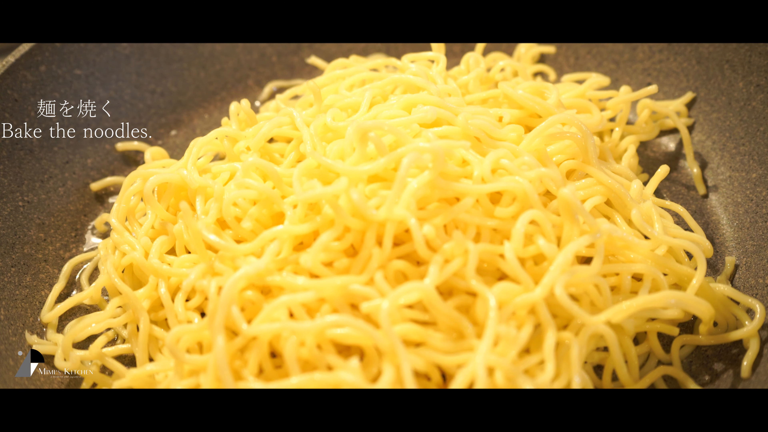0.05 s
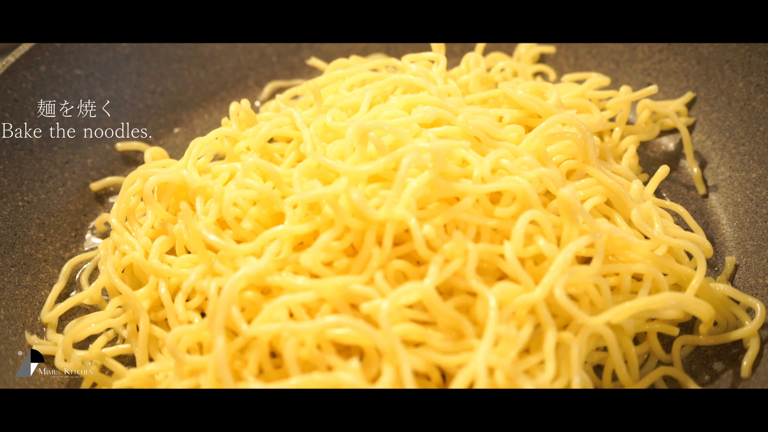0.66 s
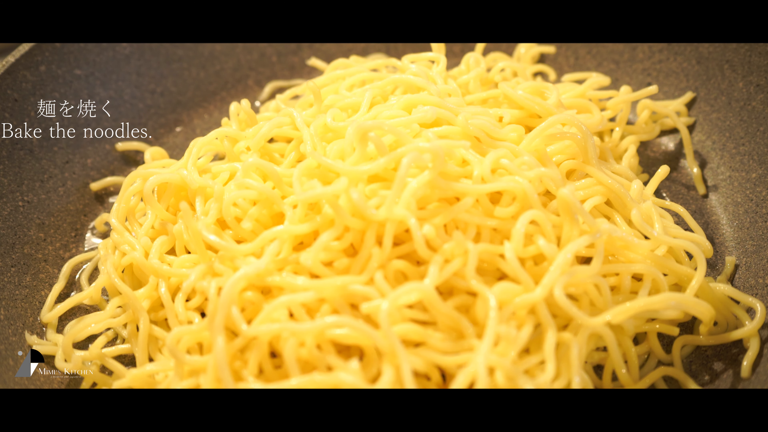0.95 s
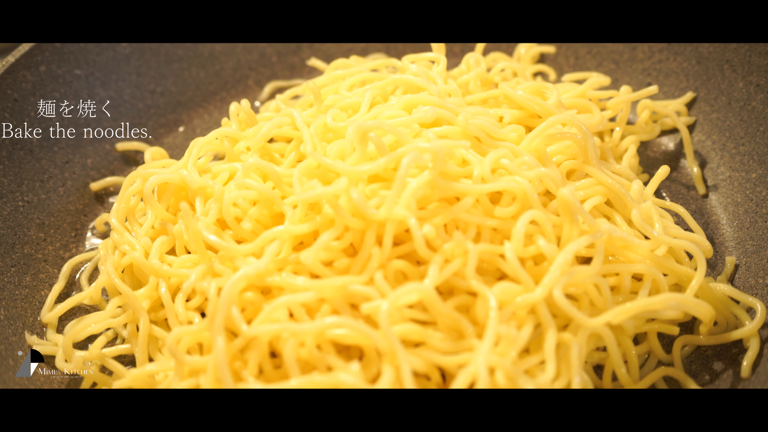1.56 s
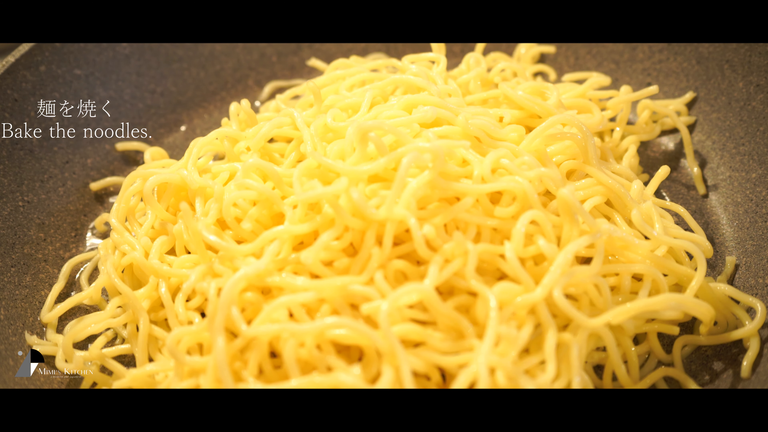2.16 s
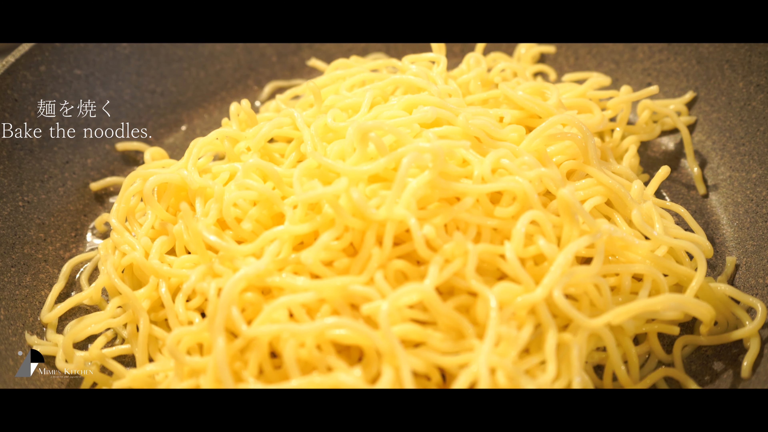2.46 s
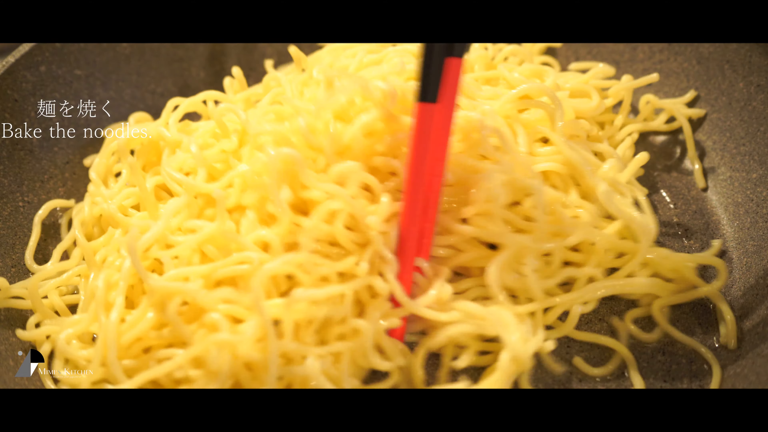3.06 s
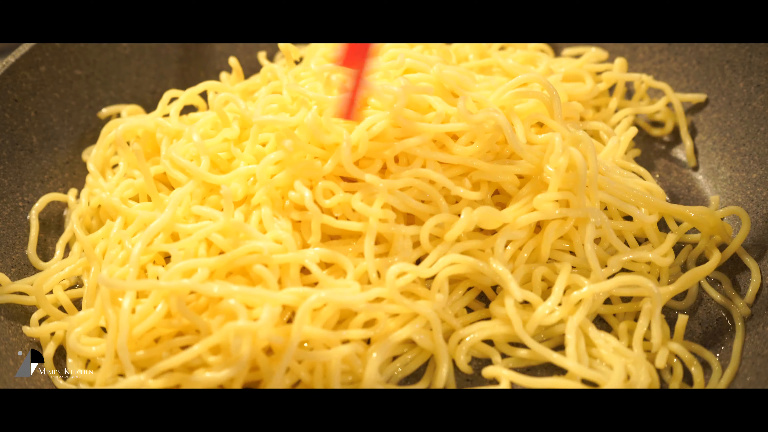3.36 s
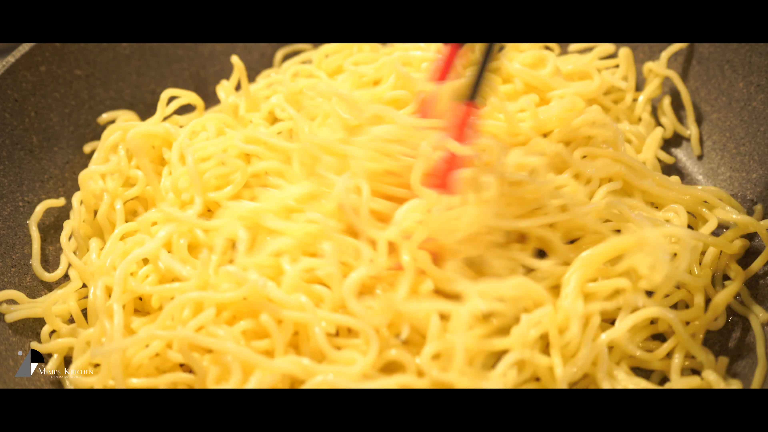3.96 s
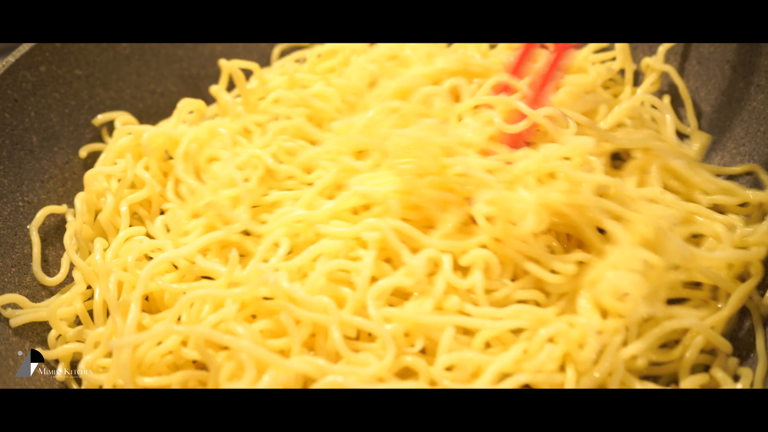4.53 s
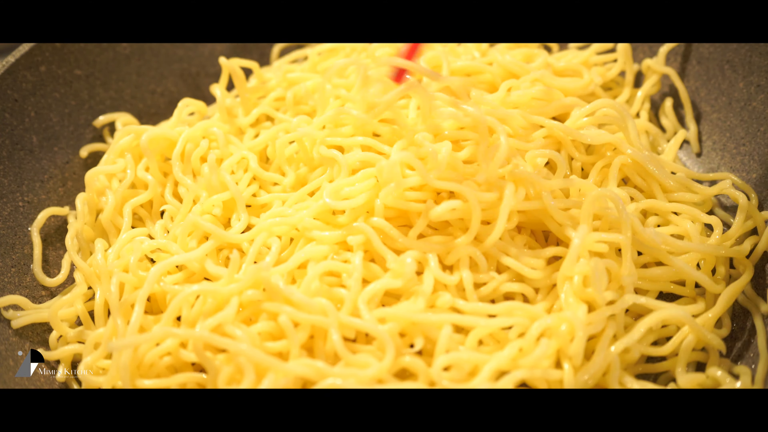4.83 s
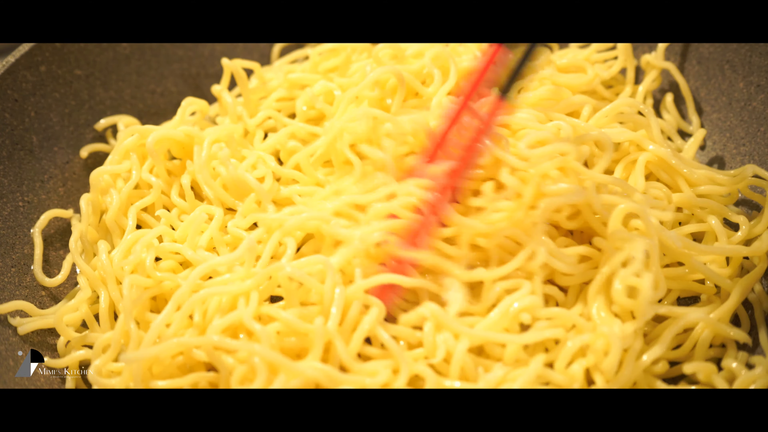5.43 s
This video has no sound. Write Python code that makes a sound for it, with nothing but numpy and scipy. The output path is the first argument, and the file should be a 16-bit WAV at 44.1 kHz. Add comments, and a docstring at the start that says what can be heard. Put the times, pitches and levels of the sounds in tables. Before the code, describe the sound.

Close to a frying pan in a small kitchen, noodles sizzle faintly over the rush of a gas flame, with scattered pops of oil. A steel container rings on the right, then clanks down and rocks briefly on the worktop. About halfway through, chopsticks start stirring with dull knocks, light ticks and short hollow scrapes, while the frying grows livelier and more droplets crackle.

```python
"""A burner hisses under softly frying noodles in a small kitchen; steam bubbles burst and oil spits.
On the right a steel vessel is knocked and rings, then is set down with a clank and rocks once;
the worktop thuds and damps it. Chopsticks bump, tap and skid on the pan, ringing its modes.
As they turn the noodles the pan rumbles, the sizzle swells and more droplets burst.
A limiter ducks the loudest sounds and recovers slowly."""
import sys
import numpy as np
from scipy import signal
from scipy.fft import rfft, irfft
from scipy.io import wavfile
from scipy.ndimage import uniform_filter1d

SR = 44100
rng = np.random.default_rng(int(sys.argv[2]) if len(sys.argv) > 2 else 0)


def log_audio(samples):
    """Write samples as a 16-bit WAV file to the path given in sys.argv[1]."""
    # one column per channel
    frames = np.atleast_2d(samples).T
    # limit to full scale, then quantise
    limited = np.clip(frames, -1, 1)
    pcm = np.round(limited * 32767).astype(np.int16)
    wavfile.write(sys.argv[1], SR, pcm)


N = 246519
TIME = np.arange(N) / SR

# flame rush spectrum: (frequency [Hz], level [dB])
RUSH_SPECTRUM = [(25, 12), (60, 6.5), (140, 9), (260, 2), (450, 0.5), (900, 1.5), (1400, -12), (2500, -27),
                 (4300, -20), (6300, -5.5), (8300, -38), (9200, -20.5), (11200, -3.5), (12300, -39),
                 (16000, -13.5)]
# burner whistles: (frequency [Hz], width [Hz], level [dB])
JET_MODES = [(655, 3.9, 5.5), (1073, 90, 0.5), (1720, 76, 2.5), (2203, 40, -1.5), (2922, 270, -4.5),
             (3132, 18.7, 6.5), (3673, 105, -4), (5035, 42, -4.5), (7230, 42, 3), (7050, 25, 8),
             (7100, 240, -29), (7600, 29, 7), (7846, 91, 4), (8040, 25, 8.5), (8500, 47, -1),
             (10400, 35, -23), (13600, 110, -9.5)]
# oil sizzle spectrum: (frequency [Hz], level [dB])
SIZZLE_SPECTRUM = [(500, -1), (1400, -25), (2400, -2), (3700, 6.5), (5000, 4.5), (6500, 4.5), (8300, 0.5),
                   (9300, -2), (11000, 0), (13400, -1.5), (14500, -16), (16000, -8)]
# large oil drops, and a wet strand snapping at 4.6 s: (time [s], level [dB], pitch [Hz], crack over pop [dB])
OIL_DROPS = [(0.615, -54, 5000, 2), (0.647, -42.5, 5960, -8.5), (0.753, -53, 6300, -12),
             (1.5005, -41.5, 4170, -8), (1.763, -41.5, 7300, -4), (1.949, -38.5, 5400, 8),
             (1.9868, -46, 4300, -16), (2.133, -47.5, 4950, -14), (2.1666, -38, 5070, -3),
             (2.937, -38.5, 2100, 0), (3.567, -38, 5500, 1.5), (3.607, -31.5, 4600, -3.5),
             (3.7715, -40, 4910, 0), (3.775, -37, 5200, 5), (3.804, -39, 5300, -5), (3.81, -36.5, 4460, 2),
             (3.8375, -31, 6400, 5), (3.881, -43, 6310, 8), (3.899, -42, 7850, 9), (3.909, -36, 6000, 11),
             (3.925, -36, 7950, 14), (3.957, -52, 5000, 7), (4.0155, -37, 5860, 9), (4.068, -36, 7050, 6),
             (4.102, -34, 3700, -1.5), (4.37, -42, 4500, -4), (4.547, -36, 7100, 7), (4.5968, -32, 8900, 4),
             (4.8256, -44, 4300, -9), (5.006, -41.5, 6670, 1), (5.106, -45.5, 5700, -12),
             (5.2065, -37, 4200, -2.5), (5.2736, -31, 5400, 4), (5.318, -25, 4700, 1),
             (5.3234, -30, 5830, 3), (5.4284, -27, 4440, 12), (5.481, -35, 4170, 0)]
# crack of a bursting drop: (frequency [Hz], level [dB])
CRACK_SPECTRUM = [(500, -12), (1400, -15.5), (2800, 4.5), (7000, 2), (13000, -11), (16000, -1.5)]
# free steel vessel: (frequency [Hz], level [dB], t60 [s], left minus right [dB])
STEEL_MODES = [(667, -15, .3, -1), (709, -9, 1.38, -9), (832, -23, .3, -5), (1873, 0, .58, -11),
               (1934, -13, .25, -11), (1979, -14, .25, -11), (2037, -17, .25, -16), (2204, -18, .55, -6),
               (2256, -22, .55, -8), (2444, -20, .55, -4), (2530, -23, .55, -9), (2985, -23, .5, -9),
               (3449, -7, .42, -13), (3489, -14, .35, -14), (3561, -16, .33, -7), (3646, -16, .33, -18),
               (5391, -18, .5, -4), (5440, -22, .35, -6), (5529, -24, .45, 0), (7079, -23, .5, -1),
               (7536, -13, .5, -15), (7585, -24, .5, 7), (7881, -18, .5, 5), (8148, -26, .45, 12),
               (8223, -18, .48, 0), (8384, -21, .45, -2), (8503, -13, .45, -5), (8791, -22, .42, 7),
               (9099, -14, .4, -17), (9208, -14, .4, -8), (9394, -23, .42, 11), (9440, -19, .45, -18),
               (9890, -11, .32, -17), (9918, -5, .32, -19), (9973, -19, .36, -7), (10237, -6, .45, -5),
               (10611, -20, .38, -8), (10855, -11, .4, -6), (11384, -16, .34, -17), (12198, -15, .38, -3),
               (12703, -11, .24, -10), (12902, -11, .28, -15), (13551, -16, .38, -2), (13899, -17, .38, -2),
               (14090, -18, .34, -6), (14440, -25, .32, -4), (15000, -29, .3, -4)]
# blows on the vessel: (time [s], ring [dB], clatter [dB], thud [dB], boom [dB],
# contact cut-off [Hz], low-mode swell [ratio], rim ping [dB])
VESSEL_BLOWS = [(0.001, -33.5, -53, -38.5, -44.5, 1570, 0, 0),
                (1.1905, -21.7, -33.5, -30, -55, 16000, 3.7, 0), (1.231, -40, -42.5, -41, -62, 7000, 0, 19),
                (1.279, -55, -47, -66, -76, 3200, 0, 6), (1.343, -53.5, -70, -76, -80, 2000, 0, 0),
                (1.381, -53, -54, -43.5, -52.5, 15000, 0, 22), (1.4125, -45, -58, -57, -59, 3900, 0, 10),
                (1.432, -60, -59, -61, -68, 4300, 0, 25), (1.814, -68, -67, -75, -81, 4200, 0, 24)]
# dense, brief contact ringing: (frequency [Hz], level [dB])
CLATTER_SPECTRUM = [(600, -7), (1300, -40), (1700, 0.5), (2050, 3.5), (2600, 5), (3000, -7), (3500, 8.5),
                    (4300, -10.5), (5400, 2), (6600, -8), (8500, -6), (10200, 11.5), (12600, -18),
                    (15500, -20)]
# worktop thud: (frequency [Hz], level [dB])
THUD_SPECTRUM = [(60, -31), (95, -5), (120, 6.5), (150, 9), (185, -11), (240, 5), (290, 7), (350, -3),
                 (415, 3), (490, -0.5), (660, 1), (850, -8), (1300, -15.5), (3000, -38)]
# worktop boom: (frequency [Hz], level [dB], t60 [s], left minus right [dB])
WORKTOP_MODES = [(70.2, 1.5, 0.39, 5), (143.6, 6, 0.32, -8), (200, -3.5, 0.38, -3), (418, 0, 0.35, -9)]
# ticks and taps on the pan: (time [s], level [dB], contact cut-off [Hz])
TICKS = [(1.0322, -35.5, 19000), (3.269, -55, 1800), (3.4944, -35, 17000), (3.763, -50.5, 1800),
         (3.815, -45.5, 2000), (3.938, -50, 1800), (4.102, -61, 2500), (5.205, -53, 2500),
         (5.318, -44.5, 4000), (5.4282, -52, 2500), (5.514, -52.5, 1800)]
# pan after a tick: (frequency [Hz], width [Hz], level [dB])
TICK_MODES = [(818, 19, -8), (1684, 21, 5), (2660, 170, -13), (3980, 98, -4.5), (5290, 110, -0.5),
              (5860, 120, -6.5), (6840, 120, -13), (7350, 200, -13), (7900, 140, -14), (8300, 170, -8.5),
              (9570, 95, -16), (10500, 280, -10), (11740, 170, -12), (13250, 270, -9), (15760, 240, -14.5)]
# bumps on the pan: (time [s], knock [dB], rocking [dB])
BUMPS = [(1.70, -55, -85), (1.858, -49.5, -79), (2.794, -78, -50), (2.864, -37, -68), (2.891, -47.5, -71),
         (3.90, -49, -60)]
# loaded pan, knocked: (frequency [Hz], width [Hz], level [dB])
KNOCK_MODES = [(233, 58, -15.5), (331, 18, -5.5), (430, 17, -1), (593, 9.7, 4.5), (656, 19, 4.5),
               (727, 38, -3), (887, 34, 4), (1080, 28, -28), (1520, 77, -12)]
# chopstick strokes: (hardest push [s], sizzle rise [s], sizzle [dB], rumble [dB])
STROKES = [(2.899, 0.07, -59.5, -58.5), (3.032, 0.056, -63.5, -64.5), (3.223, .06, -65, -59.5),
           (3.59, 0.07, -58.5, -74), (3.799, .05, -58.5, -62), (3.91, 0.052, -65, -61),
           (3.998, 0.036, -71.5, -60.5), (4.645, 0.41, -64.5, -67.5), (5.34, 0.3, -61.5, -60)]
# noodles lifted off the metal: (time [s], half-length [s], sizzle change [dB])
LIFTS = [(3.42, .06, -6.5), (3.70, .035, -4.5), (4.249, .07, -7), (4.921, .05, -4.5)]
# rubbed pan: (frequency [Hz], width [Hz], level [dB])
RUB_MODES = [(664, 23, -6), (1140, 47, 1), (1684, 105, 5), (2280, 110, -3.5), (3170, 13, -19)]
# skids of the tips: (time [s], level [dB])
SKIDS = [(3.012, -58.5), (3.868, -48.5), (3.894, -47), (3.912, -54), (3.943, -52), (4.115, -62),
         (4.603, -50), (4.630, -51), (4.665, -57), (4.720, -52.5), (4.752, -71), (5.278, -54),
         (5.340, -53.5), (5.385, -61)]
# hollow pan bottom: (frequency [Hz], width [Hz], level [dB])
BOTTOM_MODES = [(606, 28, -19), (815, 13.8, 9), (960, 16, -3.5), (1138, 49, -15)]


def undb(db):
    """Decibels to gain."""
    return 10 ** (np.asarray(db) / 20)


def unit(x):
    """Scale to rms 1."""
    return x / np.sqrt(np.mean(x ** 2))


def fade(t60_s, size=SR):
    """Exponential decay over size samples."""
    return np.exp(-np.log(1000) * TIME[:size] / t60_s)


def place(pan_db):
    """Stereo gains of unit mean power; pan_db is left minus right."""
    return unit(undb(np.array([[pan_db], [-pan_db]]) / 2))


def add(out, time_s, x):
    """Mix x into out from time_s."""
    i = max(int(time_s * SR), 0)
    out[:, i:i + x.shape[-1]] += x[..., :N - i]


def noise(size, correlation=0.):
    """Partly correlated stereo white noise."""
    white = rng.standard_normal((3, size))
    return np.sqrt(correlation) * white[2] + np.sqrt(1 - correlation) * white[:2]


def lowpass(x, hz, order=2):
    """Butterworth low-pass."""
    return signal.lfilter(*signal.butter(order, hz, fs=SR), x)


def colour(x, spectrum):
    """Filter by (Hz, dB) points, keeping the power of white noise."""
    hz, db = np.transpose(spectrum)
    bins_hz = np.maximum(np.fft.rfftfreq(x.shape[-1], 1 / SR), 1)
    gain = unit(undb(np.interp(np.log(bins_hz), np.log(hz), db)))
    return irfft(rfft(x) * gain, x.shape[-1])


def resonate(x, modes):
    """Sum of resonances of alternating sign."""
    return sum((-1) ** k * undb(db) * signal.lfilter(*signal.iirpeak(hz, hz / width_hz, SR), x)
               for k, (hz, width_hz, db) in enumerate(modes))


def walk(rate_hz):
    """Smooth random drift about zero."""
    hold = int(SR / rate_hz)
    steps = np.repeat(rng.standard_normal(N // hold + 1), hold)
    return 0.6 * uniform_filter1d(uniform_filter1d(steps, hold), hold)[:N]


def kitchen(x, wet_db, low_t60_s=0.14, treble_t60_s=0.2):
    """Direct sound plus the diffuse echo of hard walls."""
    tail = noise(SR)
    low = lowpass(tail, 3000)
    onset = np.clip(TIME[:SR] / 0.0016 - 1, 0, 1)
    echo = (low * fade(low_t60_s) + (tail - low) * fade(treble_t60_s)) * onset
    wet = signal.fftconvolve(x.mean(0)[None], unit(echo) / np.sqrt(SR), axes=1)[:, :N]
    return x + undb(wet_db) * wet


def burner():
    """The flame rushes steadily; its jets whistle and waver."""
    rush = colour(noise(N), RUSH_SPECTRUM)
    low_side = lowpass(rush[0] - rush[1], 1500, order=1)
    rush += 0.24 * low_side * np.array([[-1], [1]])  # narrows the lows
    jets = np.zeros((2, N))
    for hz, width_hz, db in JET_MODES:
        whistle = resonate(noise(N), [(hz, width_hz, db)])
        jets += whistle * undb(2 * walk(6.01)) * place(-4 if 2000 < hz < 5500 else 0)
    return undb(-64.5) * rush * undb(.5 * walk(4.6)) + undb(-60.5) * unit(jets)


def sizzle(flow, peak_bubbles_per_s=1800, spread_db=5, bands=8):
    """Tiny steam bubbles burst under the noodles, denser and louder as flow rises."""
    pops, size = np.zeros((2, N)), SR // 50
    for hz in np.geomspace(2500, 15000, bands):
        bursts = rng.random(N) < peak_bubbles_per_s / bands / SR * flow / flow.max()
        strengths = undb(spread_db * np.minimum(rng.exponential(size=N), 3.3)) * rng.choice([-1, 1], N)
        # separate short paths through the pan to each side
        grain = resonate(noise(size) * fade(0.016, size), [(hz, hz / 2, 0)])
        grain = grain / np.sqrt((grain ** 2).sum(1, keepdims=True)) * np.sqrt(hz)
        pops += signal.fftconvolve((bursts * strengths)[None], grain, axes=1)[:, :N]
    clumps = undb(4 * walk(70))  # wet strands touch the metal in fits
    crackle = unit(pops) * np.sqrt(flow * flow.mean()) * clumps
    steam = noise(N) * flow * undb(0.5 * walk(25.39))
    return kitchen(colour(undb(-3) * crackle + undb(-6.5) * steam, SIZZLE_SPECTRUM), wet_db=0.4)


def spit(db, hz, crack_db):
    """A drop bursts with a crack and a pop; a harder crack shortens and broadens the pop."""
    size = SR // 20
    pop_t60_s = np.interp(crack_db, [-10, 2], [.032, .017])
    burst = noise(size, 0.94) * fade(pop_t60_s, size)
    snap = undb(10) * signal.unit_impulse(size, 12)
    crack = colour(noise(size, 0.017) * fade(0.0055, size) + snap, CRACK_SPECTRUM)
    bubble = [(hz, hz * np.interp(crack_db, [-12, -3], [.5, .85]), 0)]
    pop = resonate(resonate(burst, bubble), bubble)
    drop = unit(pop) + undb(crack_db) * unit(crack)
    return undb(db) * place(rng.normal(-3.5, 5.5)) * drop / np.abs(drop).max()


def spitting_oil(flow, droplets_per_s=28):
    """Large drops spit, and a strand snaps, at set times; random droplets follow flow in rate and level."""
    out = np.zeros((2, N))
    for time_s, db, hz, crack_db in OIL_DROPS:
        add(out, time_s, spit(db, hz, crack_db))
    for i in rng.choice(N, int(droplets_per_s * N / SR), p=flow / flow.sum()):
        strength, pitch = rng.uniform(-2.4, 2.8, 2)
        db = 20 * np.log10(flow[i]) + 15.5 + 2 * strength
        add(out, i / SR, spit(db, hz=5470 * 2 ** (0.24 * pitch), crack_db=8))
    return kitchen(out, wet_db=-5.5)


def steel_ring(time_s, contact_hz, build_up, ping_db, set_down_s=1.1, flat_s=1.365):
    """A blow rings the steel; soft contact misses high modes, resting on the worktop damps all."""
    out, t = np.zeros((2, SR)), TIME[:SR]
    damping_per_s = 2.3 * (time_s > set_down_s)
    for hz, db, t60_s, pan_db in STEEL_MODES:
        if hz > 2.5 * contact_hz:
            continue
        gain = undb(db) / np.sqrt(1 + (hz / contact_hz) ** 8)
        envelope = gain * place(pan_db) * fade(1 / (1 / t60_s + damping_per_s))
        # a rim blow favours modes near 5.1 kHz; contact soon damps them
        ping = undb(ping_db * np.exp(-(np.log2(hz / 5100) / 0.72) ** 2))
        envelope *= 1 + (ping - 1) * fade(.17)
        if hz < 1925:  # low modes swell briefly after the blow, the lowest slowest
            peak_s = .044 * (1873 / hz) ** .64
            envelope *= 1 + build_up * undb(.7 * db) * np.exp(-((t / peak_s - 1) / .48) ** 2)
        else:  # out of round: high modes beat against a weaker twin
            beat_hz, phase_turns = rng.uniform(-22, 22), rng.random((2, 1))
            envelope *= 1 + undb(-8) * np.cos(2 * np.pi * (beat_hz * t + phase_turns))
        if hz < 1000:  # choked once the base lands flat
            envelope *= undb(-144 * np.maximum(time_s + t - flat_s, 0))
        phase_rad = np.array([[rng.choice([-1, 1]) * rng.uniform(.9, 1.9)], [0]])
        out += rng.choice([-1, 1]) * envelope * np.sin(2 * np.pi * hz * t + phase_rad)
    return out


def clatter(contact_hz):
    """The contact cracks close on the right, then washes through the room."""
    envelope = undb(10) * place(-18) * fade(.03) + place(-6) * fade(.28)
    return lowpass(colour(noise(SR, 0.5), CLATTER_SPECTRUM), contact_hz) * envelope


def worktop(thud_db, boom_db):
    """The struck worktop thuds and booms in its low modes."""
    t = TIME[:SR]
    out = undb(thud_db) * place(-4) * colour(noise(SR, .5), THUD_SPECTRUM) * fade(.29)
    for hz, db, t60_s, pan_db in WORKTOP_MODES:
        onset = np.minimum(t * hz, 1)  # the heavy top takes a cycle to move
        out += undb(boom_db + db) * place(pan_db) * np.sin(2 * np.pi * hz * t) * fade(t60_s) * onset
    return out


def vessel():
    """Each blow rings the steel, clatters at the contact and shakes the worktop."""
    out = np.zeros((2, N))
    for time_s, ring_db, clatter_db, thud_db, boom_db, contact_hz, build_up, ping_db in VESSEL_BLOWS:
        add(out, time_s, undb(ring_db) * steel_ring(time_s, contact_hz, build_up, ping_db))
        add(out, time_s, undb(clatter_db) * clatter(contact_hz))
        add(out, time_s, worktop(thud_db, boom_db))
    return out


def ticks(snap_db=-19):
    """Sharp ticks ring all the pan's modes; taps softened by noodles ring mainly the lowest."""
    out, size = np.zeros((2, N)), SR // 4
    for time_s, db, contact_hz in TICKS:
        push = undb(13) * signal.unit_impulse(size) + noise(size, 0.28) * fade(0.015, size)
        contact = lowpass(push, contact_hz)
        ring = resonate(contact, TICK_MODES)
        snap = undb(snap_db) * contact / np.abs(contact).max()
        add(out, time_s, undb(db) * (ring / np.abs(ring).max(1, keepdims=True) + snap))
    return kitchen(out, wet_db=-4.5)


def bumps(rock_hz=47):
    """Chopsticks land through the noodles, knock the pan and rock it on its stand."""
    out = np.zeros((2, N))
    rocking = -place(10) * np.sin(2 * np.pi * rock_hz * TIME[:SR]) * fade(0.96)
    for time_s, knock_db, rock_db in BUMPS:
        push = undb(25) * signal.unit_impulse(SR) + noise(SR, 0.57) * fade(.09)
        knock = resonate(lowpass(push, 1200), KNOCK_MODES)
        add(out, time_s, undb(knock_db) * knock / np.abs(knock).max() + undb(rock_db) * rocking)
    return out


def swell(peak_s, rise_s, fall_s):
    """Exponential rise to 1, then exponential fall."""
    return np.exp(-np.maximum((peak_s - TIME) / rise_s, (TIME - peak_s) / fall_s))


def stroke_gains(settle_s=0.34, rumble_s=0.091):
    """Each stroke swells fresh sizzle and rumble; overlaps add in power."""
    power = np.zeros((2, N))
    for time_s, rise_s, sizzle_db, rumble_db in STROKES:
        power[0] += (undb(sizzle_db) * swell(time_s, rise_s, settle_s)) ** 2
        power[1] += (undb(rumble_db) * swell(time_s, rumble_s, rumble_s)) ** 2
    return np.sqrt(power)


def stirring(rub_gain, rumble_gain):
    """Stirring makes the pan rumble and rubs its modes."""
    rumble = colour(noise(N, 0.55),
                    [(15, -43), (30, -9), (48, -1.5), (72, 7), (110, -16.5), (250, -22), (1000, -34)])
    rub = unit(resonate(noise(N, 1) * undb(2 * walk(38)), RUB_MODES))
    return place(13.6) * rumble * rumble_gain + rub * rub_gain


def skids(rise_s=0.007):
    """The tips stick and slip; each slip rings the pan's bottom hollowly."""
    out, t = np.zeros((2, N)), TIME[:SR // 4]
    band = signal.butter(2, [500, 1200], "band", fs=SR)
    for time_s, db in SKIDS:
        slip = noise(len(t), 0.5) * t * np.exp(-t / rise_s)
        ring = resonate(signal.lfilter(*band, slip), BOTTOM_MODES)
        add(out, time_s, undb(db) * ring / np.abs(ring).max())
    return out


def scene(idle_flow_db=-70):
    """Strokes drive the pan and the oil; flow, the frying intensity, dips as noodles are lifted."""
    fresh_gain, rumble_gain = stroke_gains()
    lull_db = sum(db * np.exp(-((TIME - time_s) / half_s) ** 2) for time_s, half_s, db in LIFTS)
    flow = np.hypot(undb(idle_flow_db), fresh_gain) * undb(lull_db)
    pan = bumps() + stirring(undb(-10) * fresh_gain, rumble_gain) + skids() + ticks()
    return burner() + vessel() + pan + sizzle(flow) + spitting_oil(flow)


def record(dry, threshold_db=-30, ratio=2, recovery_db_per_s=7, top_hz=15800):
    """A limiter ducks on a loud clank and recovers slowly; a steep low-pass cuts the top."""
    power = uniform_filter1d((dry ** 2).mean(0), size=SR // 200)
    level_db = 10 * np.log10(np.abs(power) + 1e-12)
    excess_db = np.maximum(level_db - threshold_db, 0) * (1 - 1 / ratio)
    recovery_db = recovery_db_per_s * TIME
    duck_db = np.maximum.accumulate(excess_db + recovery_db) - recovery_db
    return signal.sosfilt(signal.ellip(10, .2, 70, top_hz, fs=SR, output="sos"), dry * undb(-duck_db))


dry = scene()
out = record(dry)
log_audio(out)
```